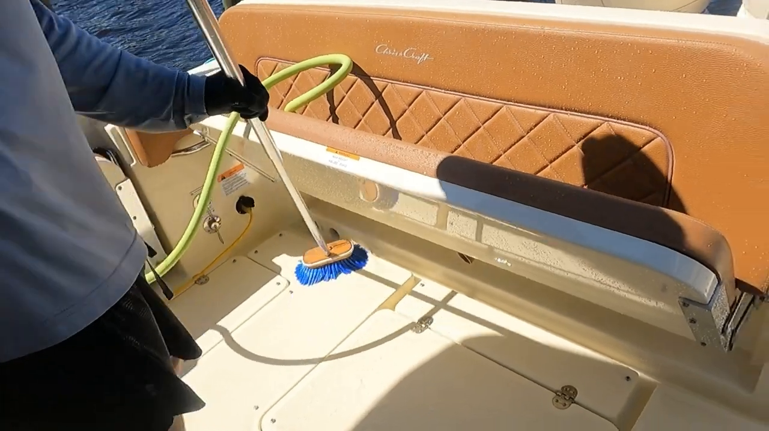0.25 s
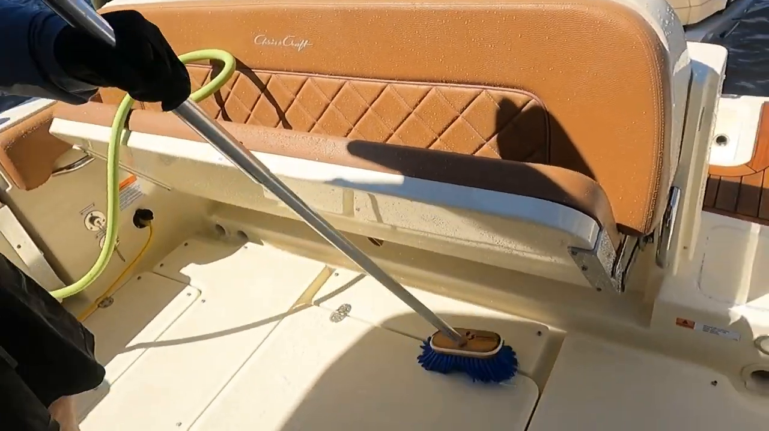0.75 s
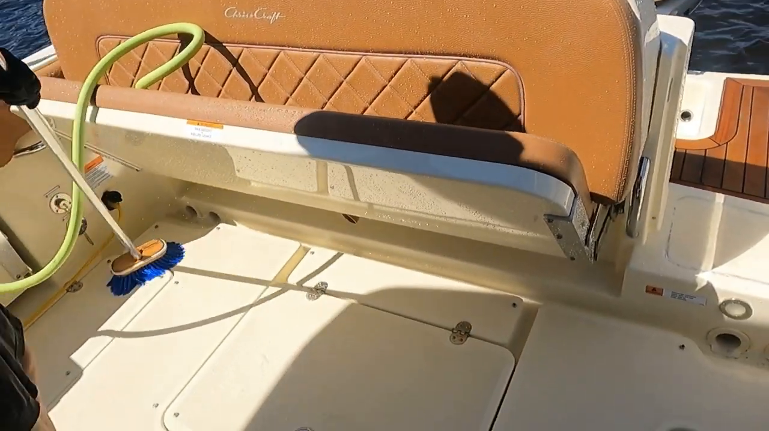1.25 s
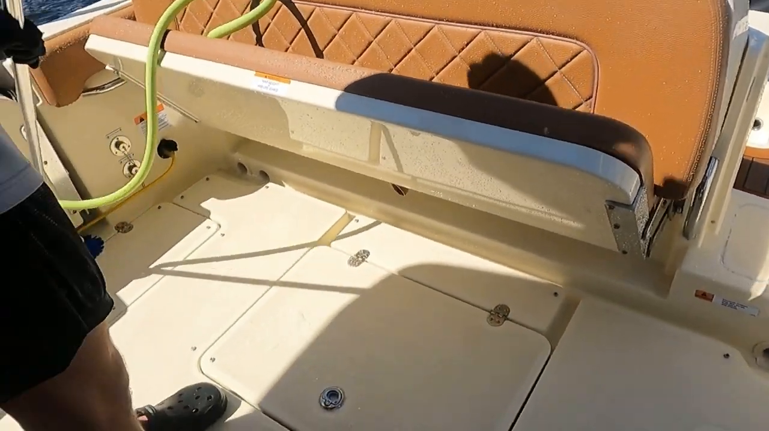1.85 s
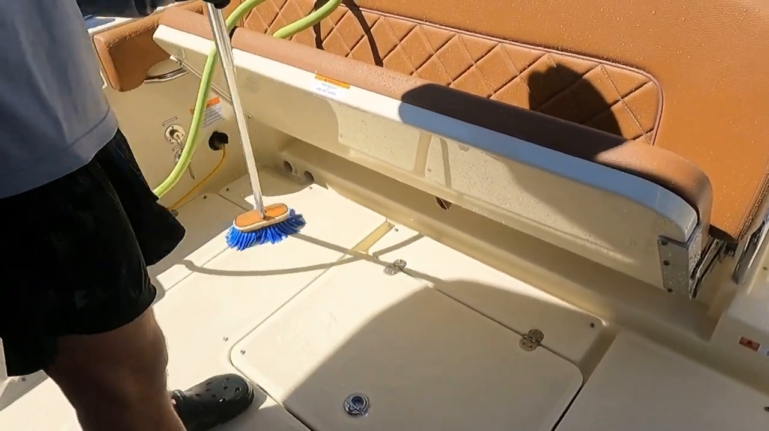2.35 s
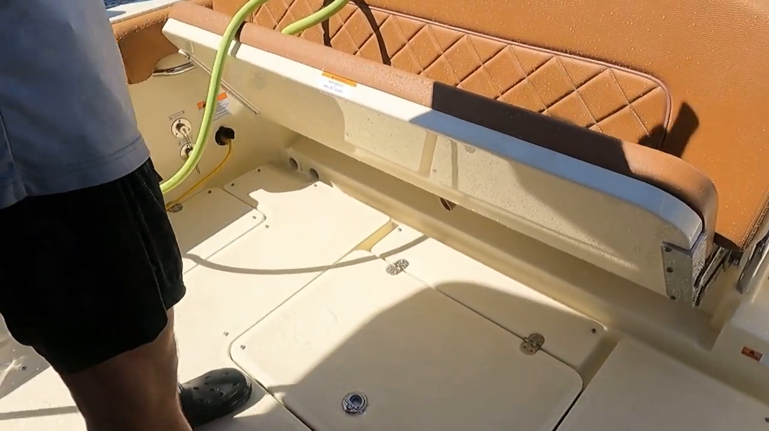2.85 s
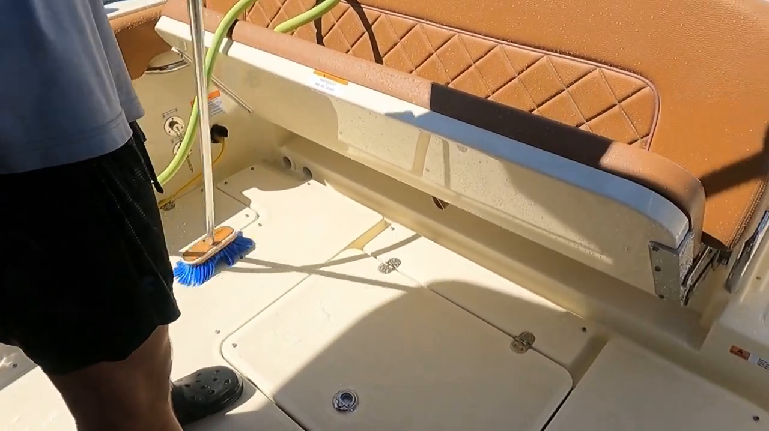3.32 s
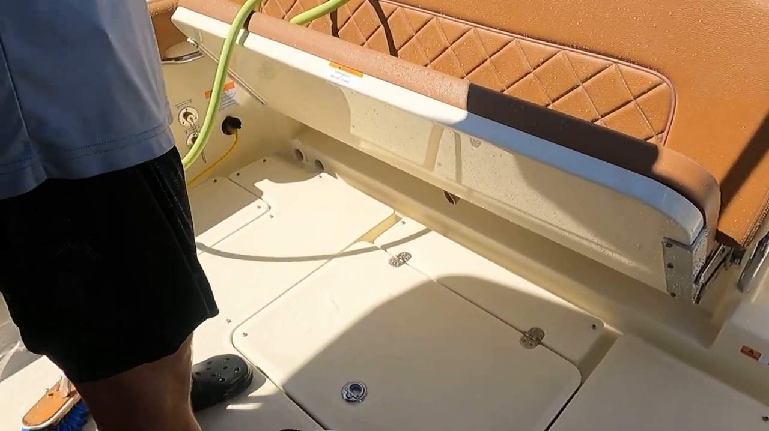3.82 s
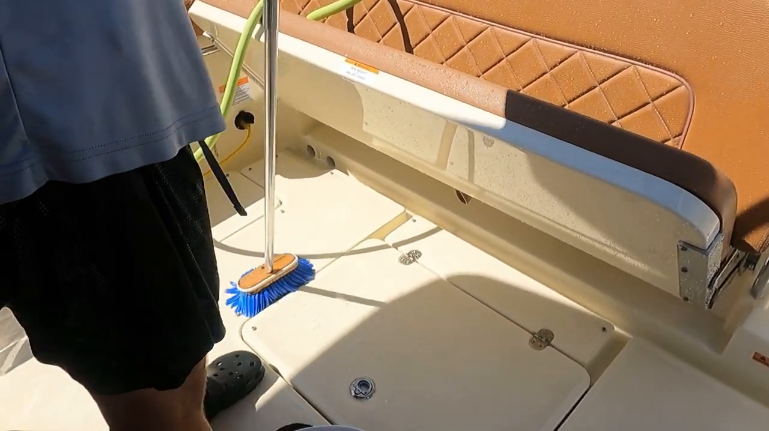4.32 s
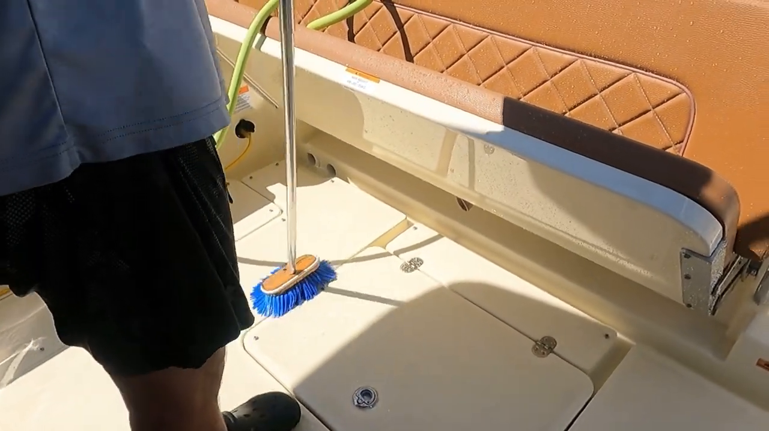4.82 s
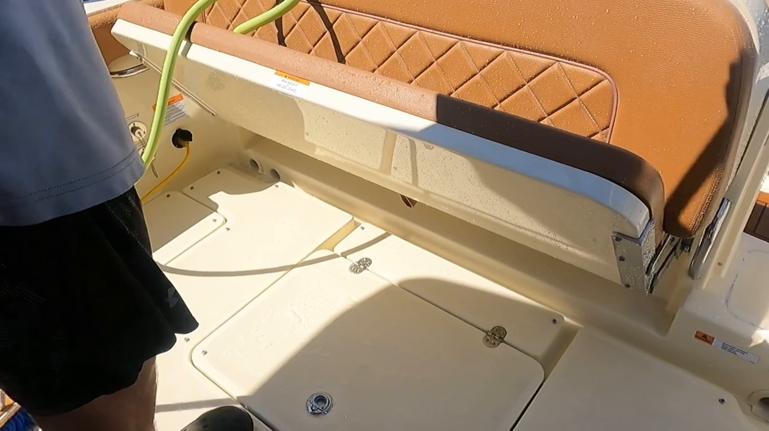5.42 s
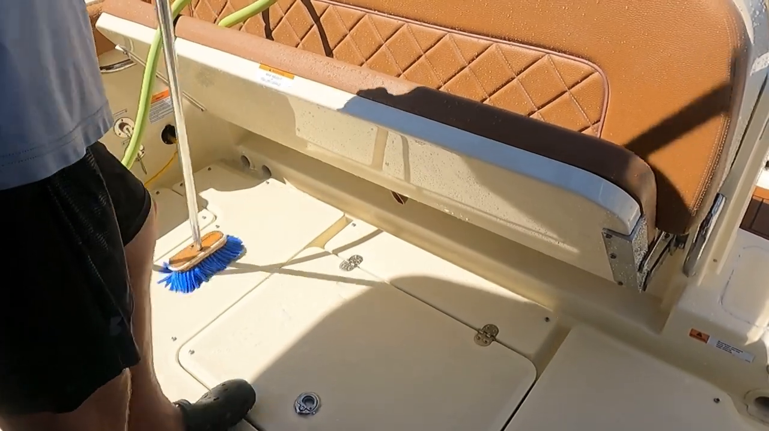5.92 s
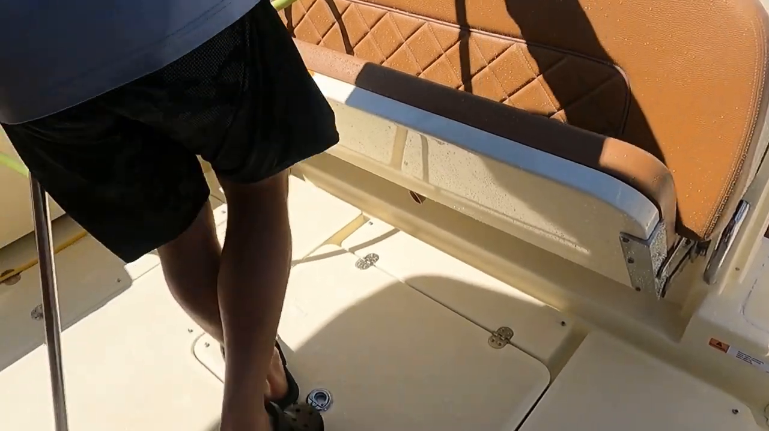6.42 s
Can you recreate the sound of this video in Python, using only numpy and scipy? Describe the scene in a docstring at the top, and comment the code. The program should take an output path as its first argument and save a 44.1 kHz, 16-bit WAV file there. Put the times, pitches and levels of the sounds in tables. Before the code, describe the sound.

A wash brush scrubs back and forth over a boat deck, with two sharp knocks, soft footsteps and a light breeze.

```python
"""On the deck of a boat in a marina, one microphone close to a soft wash brush on a long pole.
The brush scrubs to and fro over the ridged non-slip deck. Its bristles hiss, and buzz at the rate at
which they cross the ridges, so every stroke is an arch of pitch. The brush knocks against the
fibreglass, the pole ticks and feet thud on the hollow deck. A breeze and a low drone lie underneath."""
import sys
import numpy as np
from scipy import signal
from scipy.fft import rfft, irfft
from scipy.io import wavfile
from scipy.ndimage import uniform_filter1d

SR = 44100
rng = np.random.default_rng(int(sys.argv[2]) if len(sys.argv) > 2 else 0)


def bounce(signal):
    """Save signal as a 16-bit WAV file at the path given by the first command-line argument."""
    frames = np.transpose(np.atleast_2d(signal))
    limited = np.clip(frames, -1, 1)
    pcm = np.round(limited * 32767).astype(np.int16)
    wavfile.write(sys.argv[1], SR, pcm)


N = 294147
TIME = np.arange(N) / SR

# Low rumble of the breeze and of the hollow deck. Each row: frequency in Hz, relative level in dB.
RUMBLE_SPECTRUM = [(12, -7), (35, 2.5), (90, 3.5), (140, -1), (250, -10), (450, -24.5), (1200, -57.5)]


def amp(db):
    """Decibels to gain."""
    return 10 ** (np.asarray(db) / 20)


def unit(x):
    """Scales to rms 1."""
    return x / np.sqrt(np.mean(x ** 2) + 1e-20)


def colour(x, spectrum):
    """Filters x by a spectrum, to rms 1. Each row: frequency in Hz, relative level in dB."""
    hz, db = np.transpose(spectrum)
    bin_hz = np.fft.rfftfreq(len(x), 1 / SR)
    gain = amp(np.interp(np.log(bin_hz + 1), np.log(hz), db))
    return unit(irfft(rfft(x) * gain, len(x)))


def wander(hz):
    """A random drift of rms 1 that changes about hz times a second."""
    knots = rng.standard_normal(8192)
    return unit(np.interp(TIME * hz, np.arange(len(knots)), knots))


def add(mix, start, sound):
    """Lays a sound into the mix at a start in seconds."""
    part = mix[max(round(start * SR), 0):][:len(sound)]
    part += sound[:len(part)]


def ring(modes, rise_s):
    """One blow on a body: its modes swell over the rise time and die away."""
    t = np.arange(SR // 2) / SR
    tone = sum(amp(db - 60 * t / t60) * np.sin(2 * np.pi * (hz * t + rng.random()))
               for hz, db, t60 in modes)
    return tone * (1 - np.exp(-t / rise_s))


def flicks(per_s, spread_db):
    """Tiny contacts snap free: dense clicks of uneven size."""
    sizes = amp(spread_db * np.minimum(rng.exponential(1, N), 4))
    return rng.standard_normal(N) * sizes * (rng.random(N) < per_s / SR)


def marina(air_db=-43, breeze_db=-42, gust_db=3.0):
    """The background: steady air with a wavering drone, and lumps of breeze."""
    # Each row: frequency in Hz, relative level in dB.
    air_spectrum = [(40, 7.5), (150, -1), (310, -0.5), (380, -13), (600, -19), (1500, -22.5), (4000, -37),
                    (8000, -35.5), (15000, -83)]
    # Each row: centre in Hz, width in Hz, level in dB.
    drone_bands = [(162.3, 8.9, -49), (218, 10, -51), (249.8, 12, -50.5), (310.7, 14, -51)]
    air = amp(air_db) * colour(rng.standard_normal(N), air_spectrum)
    drone = np.zeros(N)
    for hz, width, db in drone_bands:
        waver = wander(2 * width) + 1j * wander(2 * width)
        drone += amp(db) * unit((waver * np.exp(2j * np.pi * hz * TIME)).real)
    breeze = colour(rng.standard_normal(N), RUMBLE_SPECTRUM) * amp(breeze_db + gust_db * wander(25))
    return air + drone + breeze


def brush_motion(fold_s=0.03476, settle_s=0.011):
    """Each stroke swings from rest to top speed and back; at the turn the bristles fold over."""
    # Each row: start in seconds, length in seconds, place of the top speed 0-1, top ridge rate in Hz,
    # relative scrape in dB, relative hiss in dB, grip (pitched share of the scrape at speed) 0-1.
    strokes = [(-0.142, 0.6, 0.52, 970, -34, -46.5, 0.16), (0.441, 0.4, 0.51, 1093, -38, -44.5, 0.34),
               (0.825, 0.52, 0.51, 956, -35, -46.5, 0.76), (1.301, 0.29, 0.61, 872, -43.5, -52, 0.25),
               (1.609, 0.26, 0.54, 907, -41.9, -52.5, 0.03), (2.144, 0.4, 0.51, 1145, -45, -51, 0.07),
               (2.544, 0.4, 0.6, 1165, -39.5, -47.5, 0.18), (2.96, 0.57, 0.63, 1161, -38, -47, 0.61),
               (3.508, 0.36, 0.5, 1103, -34, -46.5, 0.82), (3.888, 0.34, 0.53, 971.6, -31.5, -46.5, 0.78),
               (4.283, 0.324, 0.44, 1111, -33.5, -47.6, 0.74), (4.628, 0.35, 0.45, 1028, -32.5, -47, 0.72),
               (5.01, 0.35, 0.43, 1033, -34.5, -48.5, 0.73), (5.411, 0.43, 0.52, 1103, -33.5, -46, 0.94),
               (5.832, 0.445, 0.38, 962, -37.6, -49, 0.89), (6.212, 0.45, 0.48, 811, -42, -52.5, 0.22)]
    rate_power, scrape_power, hiss_power = 0.6, 0.92, 0.85
    turn_scrape_db, turn_hiss_db = -17.5, -14  # what still sounds at a turn, against the stroke's peak
    controls = np.zeros((4, N))
    for start, length, top_at, top_hz, scrape_db, hiss_db, grip in strokes:
        outside_s = np.maximum(np.maximum(start - TIME, TIME - start - length), 0)
        active = outside_s < 10 * fold_s
        progress = np.clip((TIME[active] - start) / length, 0, 1)
        skew = np.log(0.5) / np.log(top_at)
        swing = abs(np.sin(np.pi * progress ** skew))
        fold = np.exp(-outside_s[active] / fold_s)
        stroke = [top_hz * swing ** rate_power,
                  amp(scrape_db) * np.hypot(swing ** scrape_power, amp(turn_scrape_db) * fold),
                  amp(hiss_db) * np.hypot(swing ** hiss_power, amp(turn_hiss_db) * fold),
                  grip * fold]
        controls[:, active] = np.maximum(controls[:, active], stroke)
    ridge_hz, scrape_gain, hiss_gain, grip = uniform_filter1d(controls, int(settle_s * SR), axis=1)
    return ridge_hz, scrape_gain, hiss_gain, np.clip(grip, 0, 1)


def tuft_buzz(ridge_hz, grip, swell_db=2.0, chatter=0.83, tufts=8):
    """Each tuft is plucked once per ridge; tufts drag, chatter and catch up, which blurs the pitch."""
    # Each row: multiple of the ridge rate, relative level in dB.
    partials = [(1, -0.5), (2, -3.5), (3, -1.5), (4, -7.5)]
    # The brush block's resonances make passing partials flare. Each row: frequency in Hz, gain in dB.
    block_response = [(300, 3.5), (650, -3.5), (850, -5), (1000, 1.5), (1120, -0.5), (1400, -4.5),
                      (1900, 0), (2900, -3), (3500, -2.5), (5500, -11)]
    gripping_hz, skidding_hz = 35, 90  # how far the tufts' rates differ
    shaky_hz = ridge_hz + 16 * wander(35)
    spread_hz = gripping_hz + (skidding_hz - gripping_hz) * (1 - grip) ** 2
    cycles = np.array([np.cumsum(shaky_hz + spread_hz * wander(140)) / SR for _ in range(tufts)])
    phase = 2 * np.pi * (cycles % 1)
    force = np.array([1 + chatter * wander(170) for _ in range(tufts)])
    # each partial swells and fades as the bristles bend
    plucks = sum((force * np.cos(multiple * phase)).sum(0) * amp(db + swell_db * wander(30))
                 for multiple, db in partials)
    return colour(plucks, block_response)


def bristles(ridge_hz, scrape_gain, hiss_gain, grip, flutter_db=0.06):
    """Wet bristles flick over the deck: tufts buzz and scrape, tips hiss, clumps flutter faintly."""
    # Each row of both: frequency in Hz, relative level in dB.
    scrape_spectrum = [(200, -17), (450, -5.5), (650, -2.5), (1000, 5), (1400, 1.5), (2000, 3),
                       (3200, -2.5), (4500, -7.5), (8000, -46)]
    hiss_spectrum = [(500, -32), (1500, -4), (3200, 2), (4500, -0.5), (7600, -7), (9200, -17), (10200, -17),
                     (11200, -25), (12300, -23), (15500, -31)]
    # the ridges only give a pitch once the brush is moving fast
    pitched = grip * np.clip((ridge_hz - 450) / 400, 0, 1)
    buzz = amp(1.5) * tuft_buzz(ridge_hz, grip)
    skid = colour(flicks(per_s=9000, spread_db=1.5), scrape_spectrum)
    scrape = np.sqrt(pitched) * buzz + np.sqrt(1 - pitched) * skid
    hiss = colour(flicks(per_s=20000, spread_db=-0.2), hiss_spectrum)
    rub = scrape * scrape_gain * amp(-2.0) + hiss * hiss_gain * amp(3.5)
    return rub * amp(flutter_db * wander(110))


def deck_rumble(scrape_gain):
    """The hollow deck rumbles under the brush, more the harder it scrubs."""
    return amp(-6) * scrape_gain * colour(rng.standard_normal(N), RUMBLE_SPECTRUM)


def footsteps(swell_s=0.044, fade_s=0.08):
    """Soft soles load the deck slowly, so only a dull thud and its lowest modes answer."""
    # Each row: time in seconds, gain of the deck's ring in dB, level of the thud in dB.
    footfalls = [(0.0, -16.5, -25), (.925, -16, -27.5), (1.292, -16, -25), (2.285, -13.5, -26.5),
                 (6.128, -7.5, -32.5), (6.608, -10.5, -32), (6.647, -9.5, -35)]
    # The whole deck flexing. Each row: frequency in Hz, relative level in dB, t60 in seconds.
    flex_modes = [(40.3, -8.5, 0.42), (83.9, -13, 0.43), (127, -13.5, 0.15), (153, -36, 0.099),
                  (198, -17.5, 0.15)]
    flex, load = np.zeros(N), np.zeros(N)
    for at, ring_db, thud_db in footfalls:
        add(flex, at, amp(ring_db) * ring(flex_modes, rise_s=0.0039))
        # the weight comes onto the foot and settles
        load += amp(thud_db) * np.exp(-np.maximum((at - TIME) / swell_s, (TIME - at) / fade_s))
    return flex + load * colour(rng.standard_normal(N), RUMBLE_SPECTRUM)


def seam_rasps():
    """Whole rows of bristles snap over hatch seams and fittings: coarser and darker than the hiss."""
    # Each row: start in seconds, length in seconds, level in dB.
    crossings = [(0.163, 0.15, -37.5), (0.589, 0.11, -32), (2.196, 0.23, -46.5), (2.71, 0.08, -33.5),
                 (2.835, 0.027, -40), (3.238, 0.059, -38.5), (3.439, 0.016, -35.5), (3.945, 0.05, -44),
                 (4.507, 0.072, -33.5), (4.883, 0.052, -40.5), (5.183, 0.024, -50)]
    # Each row: frequency in Hz, relative level in dB.
    rasp_spectrum = [(200, -6), (450, 9), (1100, 9), (2500, 3), (4000, -6), (7500, -13.5), (10000, -33),
                     (15000, -42)]
    envelope = np.zeros(N)
    for start, length, db in crossings:
        progress = np.linspace(0, 1, int(length * SR))
        add(envelope, start, amp(db) * np.sin(np.pi * progress ** 0.42))
    return envelope * colour(flicks(per_s=4000, spread_db=1.5), rasp_spectrum)


def tuft_chirps(ridge_hz, jitter_hz=24, tremble=0.43):
    """For a moment the tufts slip in step and chirp at the ridge rate."""
    # Each row: start in seconds, length in seconds, level in dB.
    chirps = [(0.215, 0.13, -39), (1.0, 0.28, -36.5), (2.291, 0.053, -40), (3.354, 0.081, -38),
              (3.604, .14, -37), (3.98, 0.11, -40.5), (4.458, 0.058, -32), (4.701, .11, -29.5),
              (5.112, 0.13, -33), (5.569, 0.18, -42), (5.928, 0.094, -46)]
    envelope = np.zeros(N)
    for start, length, db in chirps:
        add(envelope, start, amp(db) * signal.windows.hann(int(length * SR)))
    cycles = np.cumsum(ridge_hz + jitter_hz * wander(140)) / SR
    return envelope * unit(np.sin(2 * np.pi * cycles) * (1 + tremble * wander(120)))


def knocks(blows, modes, crack_t60):
    """Each blow rings a body, and its contact crack scatters around the cockpit."""
    # Each row: frequency in Hz, relative level in dB.
    crack_spectrum = [(150, -11), (600, 11), (1100, 2), (2200, -6.5), (4000, -18), (8000, -39),
                      (15000, -60)]
    out, t = np.zeros(N), np.arange(SR // 2) / SR
    for start, ring_db, crack_db, rise_s in blows:
        envelope = amp(crack_db - 60 * t / crack_t60) * (1 - np.exp(-t / rise_s))
        crack = envelope * colour(rng.standard_normal(len(t)), crack_spectrum)
        add(out, start, amp(ring_db) * ring(modes, rise_s) + crack)
    return out


def deck_knocks():
    """The brush bumps the hollow fibreglass deck, which rings low."""
    # Each row: start in seconds, ring gain in dB, crack gain in dB, rise in seconds.
    blows = [(1.8258, 2, -28.5, 0.0011), (1.938, -29, -44.5, 0.0014), (2.092, -18, -43, 0.0057),
             (2.170, -17.5, -31.5, 0.0033), (5.806, -10.5, -44, 0.0035)]
    # Each row: frequency in Hz, relative level in dB, t60 in seconds.
    deck_modes = [(116.2, -24.5, 0.48), (180.9, -16.5, 0.33), (207.4, -16, 0.27), (261.1, -5, 0.12),
                  (324.3, -14, 0.19), (385.5, -11.5, 0.098), (467, -18.5, 0.12), (530, -19, 0.15),
                  (553, -21.5, 0.15), (597, -13, 0.041), (868, -36, 0.1), (1003, -34, 0.11),
                  (1090, -30.5, 0.092), (1280, -37, 0.084)]
    return knocks(blows, deck_modes, crack_t60=0.27)


def pole_ticks(t60=0.12, rise_s=0.0031):
    """The metal pole shifts in its socket with a short bright rattle."""
    # Each row: start in seconds, gain in dB.
    ticks = [(1.993, -44), (5.351, -43.5), (5.798, -27), (6.126, -37)]
    # Each row: frequency in Hz, relative level in dB.
    tick_spectrum = [(900, -8), (1900, 7), (2700, 0), (4500, -1.5), (7500, -19), (8500, -8.5), (9500, -17),
                     (15000, -41)]
    out, t = np.zeros(N), np.arange(SR // 4) / SR
    for start, db in ticks:
        envelope = amp(db - 60 * t / t60) * (1 - np.exp(-t / rise_s))
        add(out, start, envelope * colour(rng.standard_normal(len(t)), tick_spectrum))
    return out


def head_knocks():
    """The brush head takes a knock and rings on its metal pole, brighter than the deck."""
    # Each row: start in seconds, ring gain in dB, crack gain in dB, rise in seconds.
    blows = [(5.795, -0.5, -18, 0.0032), (6.125, -40, -39, 0.0022)]
    # Each row: frequency in Hz, relative level in dB, t60 in seconds.
    head_modes = [(108.8, -14.5, 0.2), (223.3, -12.5, 0.094), (258.7, -30.5, 0.11), (381, -25, 0.079),
                  (611.7, -20, 0.15), (670, -20, 0.11), (742, -27, 0.075), (944, -28, 0.11),
                  (1058, -20, 0.11), (1245, -22, 0.097), (1342, -22.5, 0.14), (1573, -18.5, 0.11),
                  (1862, -17.5, 0.064), (1970, -14, 0.032), (2316, -15.5, 0.034), (2410, -20, 0.05),
                  (2856, -14, 0.026), (3404, -23, 0.055), (4900, -37, 0.079), (8300, -46, 0.19)]
    return knocks(blows, head_modes, crack_t60=0.16)


def sole_scuff():
    """A sole scuffs as it swivels on the wet deck."""
    # Each row: time in seconds, level in dB.
    swivel = [(6.24, -53), (6.33, -50), (6.4, -38), (6.46, -47), (6.54, -73)]
    # Each row: frequency in Hz, relative level in dB.
    sole_spectrum = [(600, -24.5), (1250, -8), (1550, 0), (1750, -1), (2200, -15), (5000, -42)]
    times, db = np.transpose(swivel)
    envelope = amp(np.interp(TIME, times, db)) * (TIME > times[0])
    return envelope * colour(flicks(per_s=3800, spread_db=1.5), sole_spectrum)


def scene():
    """Brush, knocks and feet close by, the marina behind them, in mono."""
    ridge_hz, scrape_gain, hiss_gain, grip = brush_motion()
    brush = bristles(ridge_hz, scrape_gain, hiss_gain, grip) + tuft_chirps(ridge_hz) + seam_rasps()
    rumble = deck_rumble(scrape_gain)
    bumps = deck_knocks() + head_knocks() + pole_ticks()
    feet = sole_scuff() + footsteps()
    return (brush + rumble + bumps + feet + marina())[None]


def record(dry, ceiling=0.9, cutoff_hz=15600):
    """The microphone rounds off the highest peaks; then the top of the treble is cut."""
    rounded = dry / (1 + (dry / ceiling) ** 6) ** (1 / 6)
    lowpass = signal.firwin(511, cutoff_hz, window=("kaiser", 9), fs=SR)
    return signal.oaconvolve(rounded, lowpass[None], "same")


dry = scene()
out = record(dry)
bounce(out)
```